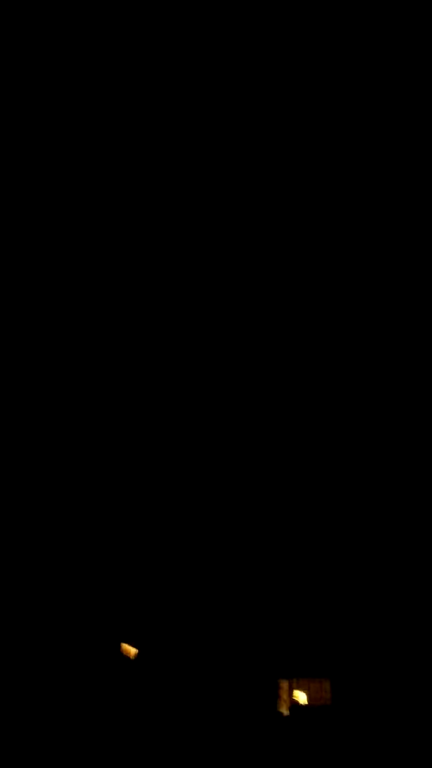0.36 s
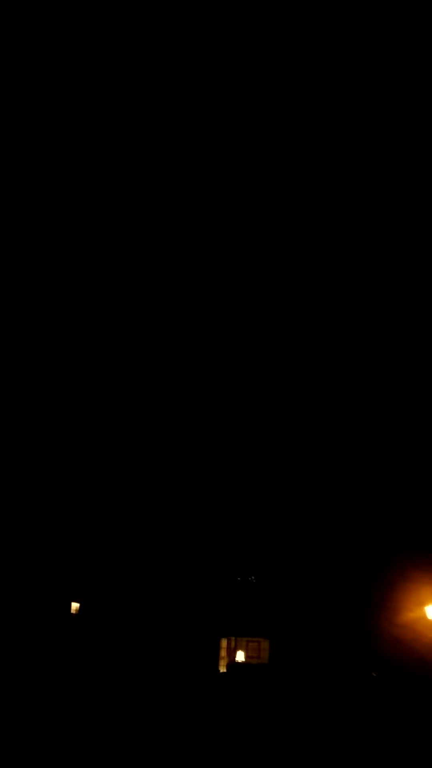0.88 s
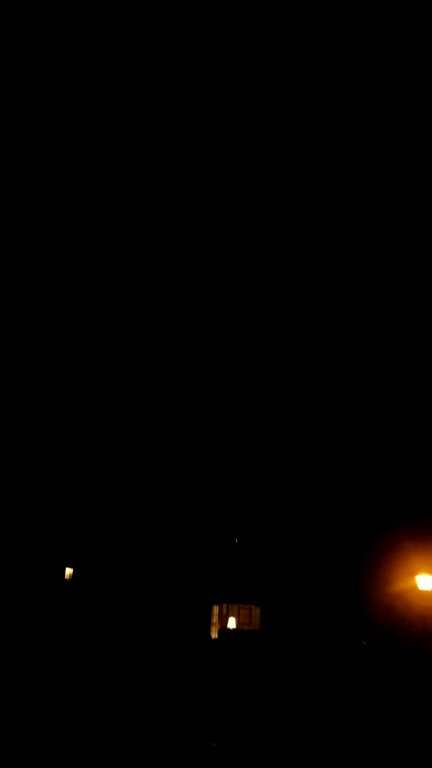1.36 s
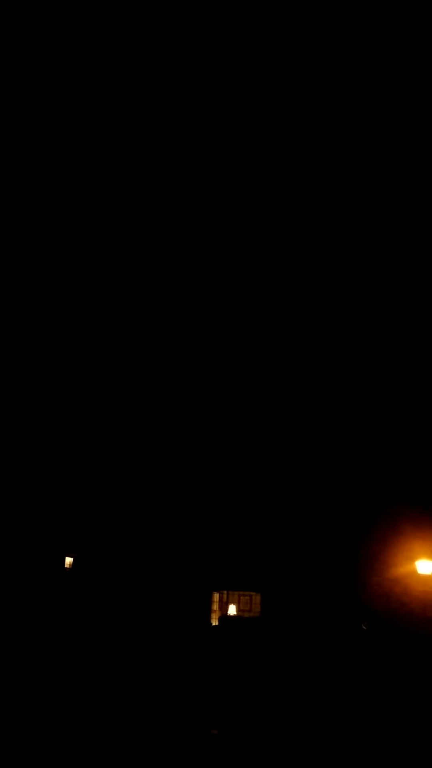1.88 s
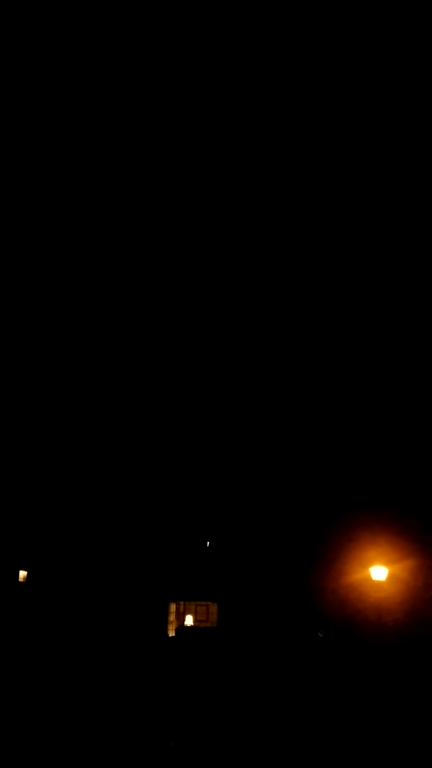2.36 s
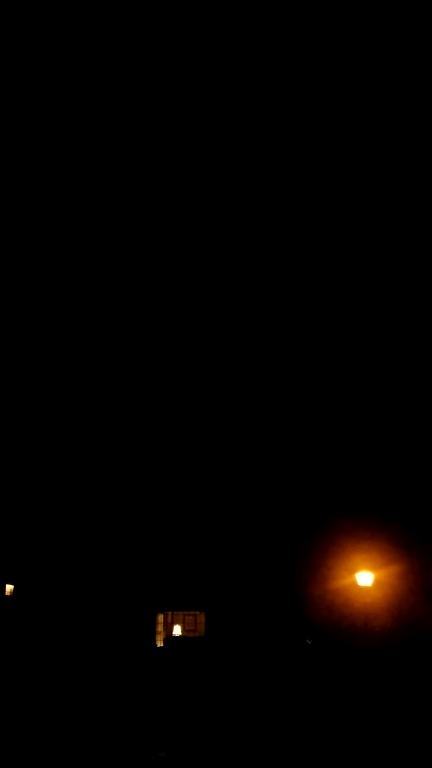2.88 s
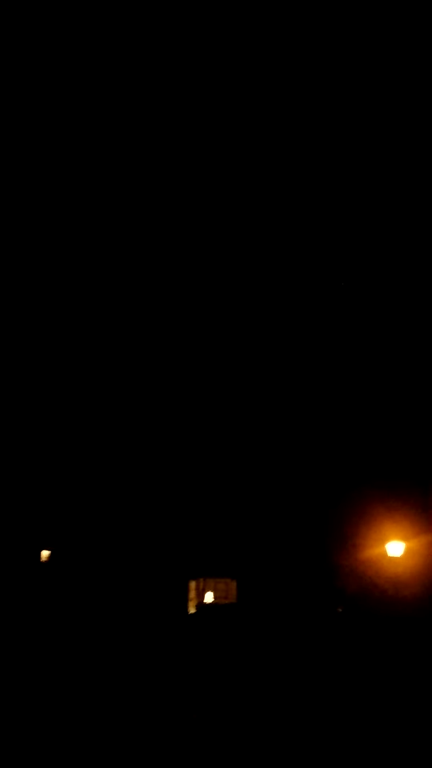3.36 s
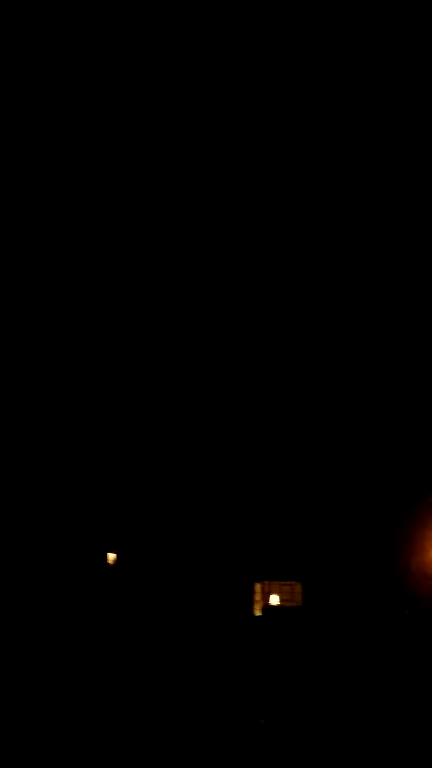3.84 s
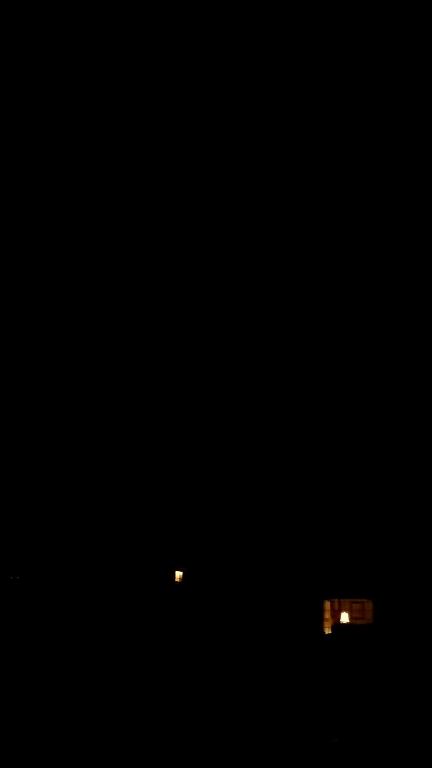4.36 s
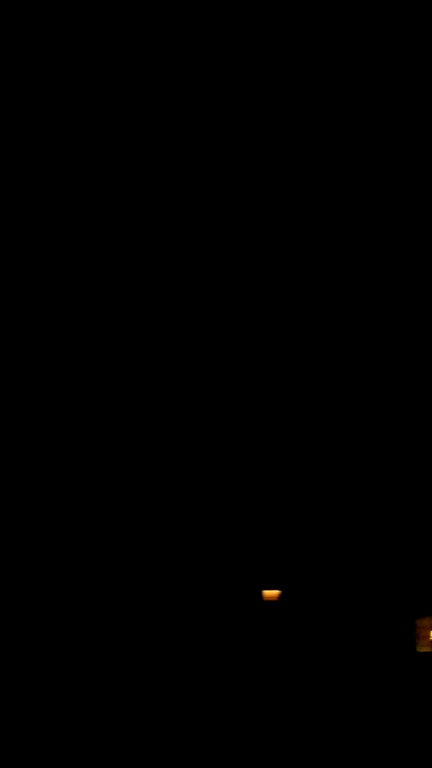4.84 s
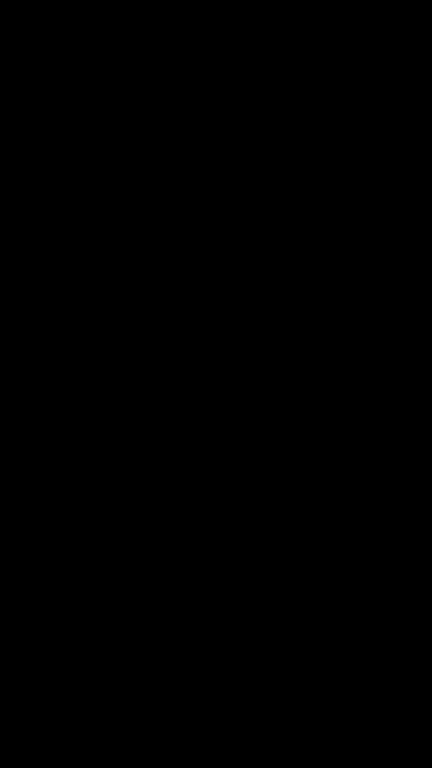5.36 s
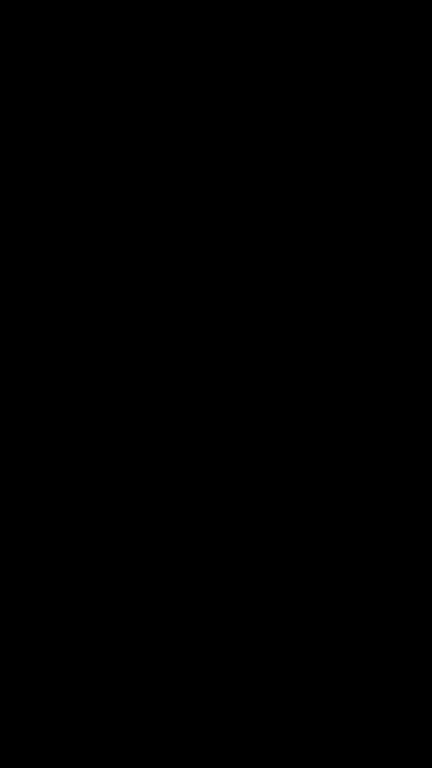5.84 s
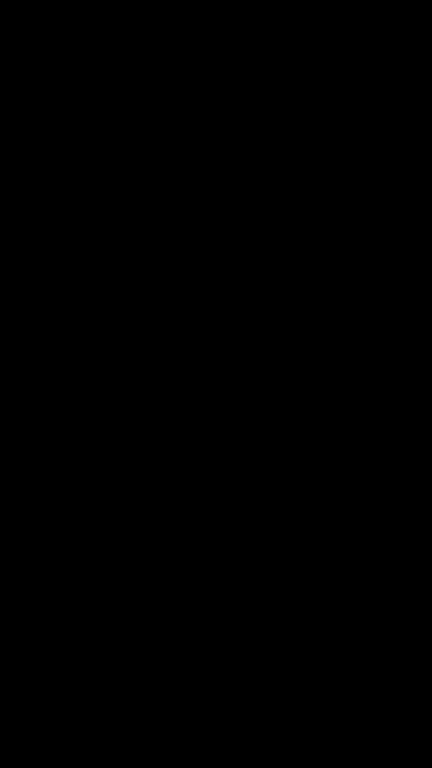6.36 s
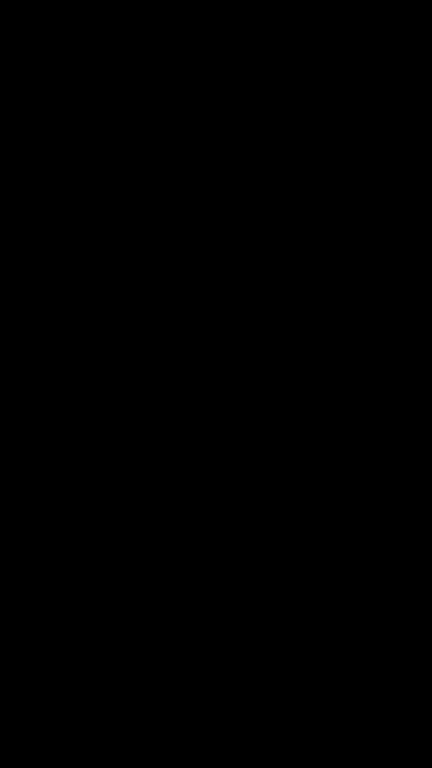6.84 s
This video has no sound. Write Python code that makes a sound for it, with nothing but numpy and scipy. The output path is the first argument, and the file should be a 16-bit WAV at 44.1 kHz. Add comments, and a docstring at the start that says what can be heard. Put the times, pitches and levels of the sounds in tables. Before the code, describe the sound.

A residential street at night, heard by a close-spaced stereo pair. Faint squeaks of a hinge, low then higher, sound from 0.05 to 0.4 s, with a soft thump at 0.25. A sharp bang at 0.37 opens a dense run of loud, short, slightly overloaded blasts until about 1.5 s, with slaps from house fronts and heavy rumble. More bangs come at 1.87 and 2.08, while crackling stars swell, with crisp separate pops thickest from 2.1 to 2.8, including a bang at 2.79. The crackle thins and dies by 3.3 s. In the lull are dull far thuds, then single strong booms at 3.86, 4.88 and a close double at 5.95, each with distant slaps and fading roll. A weaker boom falls at 5.5. Brief faint crackles appear near 4.4, 5.45 and 6.5-6.7; a very faint squeak comes at 6.7, then quiet air and hiss until 7 s.

```python
"""Fireworks over a night street

Each bang is an N-shaped pressure pulse, returned by ground and walls, then by a dying swarm of echoes.
Stars crackle as dense swarms of tiny pulses over a far rumble of wide ones; bright sparks sizzle.
Wavering sine partials make a hinge squeak faintly; shaped noise is the night air and hiss.
A pair of microphones hears it through a noise gate and a soft overload."""
import sys
import numpy as np
from scipy import signal
from scipy.fft import rfft, irfft
from scipy.io import wavfile
from scipy.ndimage import uniform_filter1d, minimum_filter1d

SR = 44100
rng = np.random.default_rng(int(sys.argv[2]) if len(sys.argv) > 2 else 0)


def store_pcm(level_fs):
    """Save levels as 16-bit WAV."""
    pcm = np.round(np.clip(level_fs, -1, 1) * 32767).astype(np.int16)
    wavfile.write(sys.argv[1], SR, np.atleast_2d(pcm).T)


def volts_from_db(level):
    """Convert decibel levels to linear amplitude ratios."""
    exponent = np.asarray(level, float) / 20
    return 10 ** exponent


N = 307377


def in_time(rows):
    """Columns interpolated over time; the first column is in seconds."""
    s, *columns = np.transpose(rows)
    return [np.interp(np.arange(N) / SR, s, c) for c in columns]


def rms_one(x):
    """Scale to unit rms."""
    return x / np.sqrt(np.mean(x ** 2) + 1e-20)


def cut(x, hz, kind, order=2):
    """Butterworth filter along time."""
    return signal.sosfilt(signal.butter(order, hz, kind, fs=SR, output="sos"), x + 1e-18)


def wander(below_hz):
    """Slow random curve, rms 1."""
    return rms_one(cut(rng.standard_normal(N), below_hz, "low"))


def coloured(x, points):
    """Shape by a spectrum, minimum phase so that nothing sounds early."""
    hz, db = np.transpose(points)
    grid_hz = np.maximum(np.arange(2049) * SR / 4096, 1)
    cepstrum = irfft(np.log(volts_from_db(np.interp(np.log(grid_hz), np.log(hz), db))))
    cepstrum[1:2048] *= 2
    cepstrum[2049:] = 0
    response = irfft(np.exp(rfft(cepstrum)))
    return signal.fftconvolve(x, response[None], axes=1)[:, :x.shape[1]]


def n_wave(width_ms, damping=.5, rounding=1.0):
    """A jump, a fall into suction and a small rebound, rounded by the air; height 1, and index of its top."""
    width_ms = max(width_ms, .08)
    t = np.arange(900) / SR * 1000 / width_ms   # in widths
    shape = np.cos(1.284 * t) * np.exp(-damping * t)
    pulse = cut(shape, min(1000 * rounding / width_ms, 9000), "low", order=3)
    return pulse / pulse.max(), int(np.argmax(pulse))


PORT_LAG_MS, PORT_SHADE_DB = .3, 0.2


def arrivals(size, per_s, spread_db, lean_ms=0.):
    """Random arrivals from all sides: each reaches one port a little earlier and louder; rms 1."""
    draw = rng.random((4, size))
    at = np.flatnonzero(draw[0] < per_s / SR)
    polarity = np.where(draw[2, at] < .5, 1, -1)
    height = volts_from_db(spread_db * np.minimum(-np.log(draw[1, at] + 1e-9), 4)) * polarity
    side = 2 * draw[3, at] - 1
    half_lag = np.round((side * PORT_LAG_MS + lean_ms) * SR / 2000).astype(int)
    out = np.zeros((2, size))
    for ch, sign in enumerate((1, -1)):
        port_at = np.clip(at + sign * half_lag, 0, size - 1)
        np.add.at(out[ch], port_at, height * volts_from_db(-sign * PORT_SHADE_DB * side))
    return rms_one(out)


# what the street gives back of an echo: freq_hz, gain_db
STREET_RESPONSE = [(40, -2), (90, -1), (170, 1.5), (300, 0), (560, 1), (760, -2), (1000, 2), (1220, -0.5),
                   (1400, -1), (2500, -1), (5000, -11)]


def street(x):
    """Echoes take the colour of the street's surfaces."""
    return coloured(x, STREET_RESPONSE)


SALVO_START_S, SALVO_END_S = .5, 1.3   # a quick run of shells close to the house fronts
FAR_AFTER_S = 1.6   # later shells burst farther off


def in_salvo(s):
    """True for shells of the quick run."""
    return SALVO_START_S < s < SALVO_END_S


LOUD_DB, BIG_MS = -6, .52   # only bangs both louder and wider get these returns
DELAY_SPREAD = .05   # fraction of delay


def returns(after_salvo, after_single, spread_db):
    """Rows (time_s, level_db, ..) thrown back after each loud big bang, with random delay and level."""
    rows = []
    for (s, db, width_ms, *_), chance in zip(BANGS, rng.normal(0, 1, (len(BANGS), 8, 2))):
        if db > LOUD_DB and width_ms > BIG_MS:
            surfaces = after_salvo if in_salvo(s) else after_single
            for (delay_s, rel_db, *rest), (late, loud) in zip(surfaces, chance):
                time_s = s + delay_s * (1 + DELAY_SPREAD * late)
                rows.append((time_s, db + rel_db + spread_db * loud, *rest))
    return rows


def after_bangs(levels_db, rise_s, t60_s):
    """Power that swells and dies after each row of BANGS, summed."""
    t = np.maximum(np.arange(0, N + 64, 64) / SR - np.array(BANGS)[:, :1], 0)
    swell = 1 - np.exp(-(t / rise_s) ** 2)
    power = volts_from_db(levels_db)[:, None] ** 2 * swell * volts_from_db(-60 * t / t60_s) ** 2
    return np.interp(np.arange(N) / 64, np.arange(t.shape[1]), power.sum(axis=0))


# crackling stars of single shells: full_strength_s, level_db, hold_s
SINGLE_STARS = [(3.474, -54.5, 0.019), (4.403, -36.5, 0.079), (5.429, -45, 0.048), (5.476, -44, 0.099),
                (6.489, -48, 0.12), (6.636, -56, 0.074)]
STAR_RISE_DB_PER_S, STAR_FALL_DB_PER_S = 326, 119


def stars_db():
    """Rise, hold and fall of the crackle for each single shell."""
    db, t = np.full(N, -120.), np.arange(N) / SR
    for s, level_db, hold_s in SINGLE_STARS:
        rise_db = STAR_RISE_DB_PER_S * (s - t).clip(0)
        fall_db = STAR_FALL_DB_PER_S * (t - s - hold_s).clip(0)
        db = np.maximum(db, level_db - rise_db - fall_db)
    return db


# night air and microphone hiss: freq_hz, relative_density_db
NIGHT_SPECTRUM = [(30, -7.5), (100, -0.5), (400, -3), (1000, -29), (1600, -18.5), (4000, -25.5),
                  (8000, -27), (12000, -28.5), (15500, -39.5)]
NIGHT_DB = -57
WHINE_HZ, WHINE_DB = 14760, -77.5


def night():
    """Steady night air and hiss, alike in both ports only in the bass, with a thin electronic whine."""
    mid, side = rng.standard_normal((2, N))
    side = cut(side, 340, "high", order=1) + .15 * side
    air = rms_one(coloured(np.array([mid + side, mid - side]), NIGHT_SPECTRUM))
    whine = rms_one(cut(rng.standard_normal((2, N)), [WHINE_HZ - 40, WHINE_HZ + 40], "band"))
    return volts_from_db(NIGHT_DB) * air + volts_from_db(WHINE_DB) * whine


RUMBLE_DB, RUMBLE_SALVO_DB = -27, -21.5   # relative to each row of BANGS
RUMBLE_RISE_S, RUMBLE_T60_S = 0.044, 0.64
RUMBLE_FLOOR_DB, FLOOR_WANDER_DB = -56, 2
RUMBLE_UNDER_CRACKLE_DB, RUMBLE_UNDER_STARS_DB = 1.5, -4
RUMBLE_BASS_DB = -8
RUMBLE_BRIGHT_DB, RUMBLE_BRIGHT_HZ = -10, (900, 1170)   # the street rings in a narrow upper band


def rumble():
    """Far echoes: a dense roll of wide, dull pulses; those of the bangs add a deep and a ringing band."""
    levels_db = np.array([db + (RUMBLE_SALVO_DB if in_salvo(s) else RUMBLE_DB) for s, db, *_ in BANGS])
    floor = volts_from_db(RUMBLE_FLOOR_DB + FLOOR_WANDER_DB * wander(16)) ** 2
    boom_power = after_bangs(levels_db, RUMBLE_RISE_S, RUMBLE_T60_S) + floor
    star_power = volts_from_db(in_time(CRACKLE_SWARM)[0] + RUMBLE_UNDER_CRACKLE_DB) ** 2
    star_power = star_power + volts_from_db(stars_db() + RUMBLE_UNDER_STARS_DB) ** 2

    pulse = n_wave(0.54, damping=0.44, rounding=0.55)[0]
    roll = signal.fftconvolve(arrivals(N, 700, 2.5), pulse[None], axes=1)[:, :N]
    deep = cut(arrivals(N, 270, 7.0), [55, 135], "band")
    bright = cut(arrivals(N, 610, 2.2), RUMBLE_BRIGHT_HZ, "band", order=3)
    lumps = volts_from_db(0.91 * wander(11.5))
    bright_lumps = volts_from_db(RUMBLE_BRIGHT_DB + 2.5 * wander(25))

    out = bright_lumps * np.sqrt(boom_power) * rms_one(bright)
    out = out + lumps * np.sqrt(boom_power + star_power) * rms_one(roll)
    return out + volts_from_db(RUMBLE_BASS_DB) * np.sqrt(boom_power) * lumps * rms_one(deep)


# bangs, near and far, and some of their strongest slap-back echoes:
# peak_s, level_db, pulse_width_ms, relative_swarm_db, relative_scatter_db
BANGS = [(0.024, -45, 0.45, 5.5, -26), (0.06, -42, 0.27, 6, -24.5), (0.2448, -20, 1.45, -6.5, -33),
         (0.3738, 0.5, 0.44, -5.5, -22.5), (0.457, -10.5, 0.78, -7, -22.5), (0.543, 4.5, 0.65, -4.5, -15),
         (0.6564, 0, 0.42, -8, -17.5), (0.6919, 2, 0.7, -2.5, -12), (0.8229, 2.5, 0.76, -4, -17),
         (0.9451, 2, 0.55, -4, -16), (1.0841, 3, 0.66, -3.5, -13.5), (1.199, -4.5, 0.4, -12.5, -30),
         (1.2229, -3.5, 0.35, -6.5, -26), (1.4215, -0.5, 0.71, -3.5, -13.5), (1.4917, -8, 0.36, -7.5, -32),
         (1.523, -9, 0.6, -1, -17), (1.8654, -4, 0.57, -7.5, -21), (2.076, -3.5, 0.38, -2, -17),
         (2.789, -8, 0.51, -4, -22), (2.8687, -15.5, 0.54, -15, -17), (3.372, -25.5, 0.58, -7, -42),
         (3.5206, -30, 0.51, 2.5, -38), (3.8572, -1.5, 0.522, -5, -21), (4.1993, -25.5, 1.35, -5.5, -60),
         (4.5506, -30.5, 0.3, 1.5, -9.5), (4.8828, -2, 0.58, -3.5, -21), (5.511, -20, 1.09, -1.5, -19),
         (5.8473, -39.5, 0.97, 2.5, -34.5), (5.945, -3, 0.72, -8, -18.5), (5.957, -5.5, 0.45, -6, -40),
         (6.348, -27.5, 0.84, -3.5, -53), (6.519, -34.5, 1.3, -10, -26.5)]
# distinct slaps off far houses after single shots: same columns
FAR_SLAPS = [(1.59, -21, 0.53, -8, -32), (3.047, -29, 0.68, 6, -40), (3.983, -19.5, 0.57, -2, -23),
             (4.052, -23.5, 0.7, -4.5, -22), (4.085, -21.5, 0.47, 0, -32), (4.219, -32, 0.84, 5.5, -52),
             (5.034, -14, 0.64, -3, -35), (5.111, -20.5, 0.62, -1.5, -33), (5.191, -27.5, 1, -2, -41),
             (6.07, -22, 0.46, 0, -31), (6.115, -25, 0.63, -12, -35), (6.165, -21.5, 0.45, -3.5, -31),
             (6.378, -34.5, 0.47, -3, -45)]
# house slaps after salvo shells: delay_s, relative_level_db, then the last three columns above
SALVO_SLAPS = [(.05, -14, 0.93, -3, -17)]
# returns from ground and near walls: delay_ms, relative_level_db, narrowing (fraction of pulse width)
NEAR_ECHOES = [(2.052, -2.5, 0.27), (4.95, -15, -.4), (12.75, -6.5, 0.01), (17.47, -10, 0.7),
               (21.8, -13, 0.5), (28, -17, .3)]
# loud bangs come from the launch side, faint ones from across the street: level_db, left_lag_ms
BEARING = [(-19.5, -0.22), (-16, -0.16), (-1, 0.12)]
CRACK_DB = -21
FAR_AIR_HZ = 4500   # the air dulls far blasts
LEAD = 20   # samples kept free ahead of the pulse


def bangs():
    """Direct pulse, near returns, a two-slope echo swarm and a treble scatter from leaves and edges."""
    size = SR // 2
    out, echoes = np.zeros((2, 2, N + 2 * size))
    t = np.arange(size) / SR
    swarm_shape = (1 - np.exp(-t / 0.003)) * (volts_from_db(-60 * t / 0.14) + volts_from_db(-13.5 - 60 * t / 1.42))
    scatter_shape = (1 - np.exp(-(t / 0.0078) ** 2)) * (volts_from_db(-60 * t / 0.14) + volts_from_db(-11.5 - 60 * t / 0.88))
    fade = np.clip((size - np.arange(size)) / 4000, 0, 1)
    for peak_s, db, width_ms, swarm_db, scatter_db in BANGS + FAR_SLAPS + returns(SALVO_SLAPS, [], 0.56):
        lag_ms = np.interp(db, *np.transpose(BEARING))
        pulse, top = n_wave(width_ms)
        swarm = volts_from_db(swarm_db - 20.0) * swarm_shape * arrivals(size, 500, 2.4, lean_ms=1.26 * lag_ms)

        paths = np.zeros((2, size))
        half_lag = round(lag_ms * SR / 2000)
        paths[0, LEAD + half_lag] = 1
        paths[1, LEAD - half_lag] = 1
        front, front_top = n_wave(width_ms / 3)
        crack = np.roll(front, top - front_top)   # the steep shock front
        sound = signal.fftconvolve(paths, (pulse + volts_from_db(CRACK_DB) * crack)[None], axes=1)[:, :size]

        chances = rng.normal(0, 1, (len(NEAR_ECHOES), 3))
        for (delay_ms, echo_db, narrowing), (late, loud, side) in zip(NEAR_ECHOES, chances):
            echo = n_wave(width_ms * (1 - narrowing))[0]
            echo = volts_from_db(0.72 * swarm_db - 1.0 + echo_db + 0.39 * loud) * echo
            for ch, sign in enumerate((1, -1)):
                port_ms = delay_ms * (1 + .03 * late) + sign * (lag_ms / 2 + .05 * side)
                i = LEAD + round(port_ms * SR / 1000)
                sound[ch, i:i + len(echo)] += echo
        if peak_s > FAR_AFTER_S:
            sound = cut(sound, FAR_AIR_HZ, "low", order=3)

        scatter = cut(cut(arrivals(size, 6000, 3.4), 1100, "high"), 2610, "low", order=4)
        sound += volts_from_db(scatter_db) * scatter_shape * rms_one(scatter)
        i = max(round(peak_s * SR) - top - LEAD, 0)
        out[:, i:i + size] += volts_from_db(db) * sound * fade
        swarm = signal.fftconvolve(swarm, pulse[None], axes=1)[:, :size]
        echoes[:, i:i + size] += volts_from_db(db) * swarm * fade
    return (out + street(echoes))[:, :N]


SIZZLE_DB, SIZZLE_PER_TREBLE_DB, FAR_SIZZLE_DB = -20.5, 1.29, -7
SIZZLE_RISE_S, SIZZLE_T60_S = 0.0054, 0.89


def sizzle():
    """Sparks of bright shells: very dense, tiny bright ticks, fainter for far shells."""
    peak_s, level_db, _, _, scatter_db = np.transpose(BANGS)
    levels_db = SIZZLE_DB + SIZZLE_PER_TREBLE_DB * (level_db + scatter_db)
    levels_db = levels_db + FAR_SIZZLE_DB * (peak_s > FAR_AFTER_S)
    power = after_bangs(levels_db, SIZZLE_RISE_S, SIZZLE_T60_S)
    ticks = cut(cut(arrivals(N, 8200, 2.4), [3500, 13500], "band"), 4400, "low", order=1)
    return np.sqrt(power) * rms_one(ticks)


def squeak(rows, partials):
    """Stick-slip tone: a few upper partials, wavering in strength, off to one side."""
    hz, db, tilt_db = in_time(rows)
    on = (np.arange(N) > rows[0][0] * SR) & (np.arange(N) < rows[-1][0] * SR)
    phase = 2 * np.pi * np.cumsum(hz * (1 + .004 * wander(60))) / SR
    tone = 0
    for k, partial_db in partials:
        waver_db = 4.0 * wander(25)
        tone = tone + volts_from_db(partial_db + tilt_db * (k - 4) + waver_db) * np.sin(k * phase)
    tone = volts_from_db(db) * on * tone
    return np.array([tone, volts_from_db(-2.0) * np.roll(tone, 6)])   # right: fainter, 6 samples later


# hinge squeaks: time_s, pitch_hz, level_db, tilt_db_per_partial
LOW_SQUEAK = [(.03, 462, -63, -12), (.07, 467, -54, -12), (.1, 468, -47, -6), (.13, 462, -52, 3),
              (.155, 462, -58, -2), (.19, 467, -60, -4), (.26, 466, -59, -8)]
HIGH_SQUEAK = [(.228, 612, -62, 0), (.25, 626, -55, 0), (.275, 648, -52, -1), (.295, 654, -53, -1),
               (.325, 659, -47, -3), (.36, 661, -48, -4), (.39, 661, -55, -2)]
LATE_SQUEAK = [(6.62, 513, -70, 0), (6.66, 513, -56, 0), (6.78, 514, -57, 0), (6.81, 512, -70, 0)]
# their partials: pitch_multiple, relative_level_db
LOW_PARTIALS = [(4, 0), (5.1, 0)]
HIGH_PARTIALS = [(3, -12), (4, 3), (5, 4), (7, -11), (9, -12)]
LATE_PARTIALS = [(5, 0), (6, 4)]


def hinge():
    """Three stick-slip squeaks, each with its own partials."""
    early = squeak(LOW_SQUEAK, LOW_PARTIALS) + squeak(HIGH_SQUEAK, HIGH_PARTIALS)
    return early + squeak(LATE_SQUEAK, LATE_PARTIALS)


# crackling stars of the salvo: time_s, relative_level_db, density_per_s (twice the rate of distinct pops)
CRACKLE_SWARM = [(.52, -97, 2200), (.6, -50.5, 2900), (.8, -32, 1350), (1.35, -39.5, 3600),
                 (1.65, -35.5, 2270), (2.0, -31, 2000), (2.5, -33.5, 1280), (2.7, -38, 500),
                 (2.9, -41, 520), (3.1, -52, 1740), (3.2, -48.5, 3700), (3.28, -59, 1700),
                 (3.65, -72, 3600)]
# lone pops of crackling stars: time_s, level_db, left_over_right_db
LONE_POPS = [(1.624, -8.5, -1), (1.931, -9, 2), (2.147, -9, -0.5), (2.163, -10, 0), (2.191, -19, 4),
             (2.206, -23, -3), (2.281, -18, -2), (2.302, -7, 0), (2.334, -22, -2), (2.347, -10, -2),
             (2.357, -16, 4), (2.366, -10, -3), (2.392, -11, 0), (2.41, -13, 0), (2.437, -19, 0),
             (2.445, -13, -2), (2.471, -15, 0), (2.494, -18, 0), (2.519, -6, 0.5), (2.522, -7.5, 0),
             (2.535, -12, 4), (2.565, -12, -2), (2.594, -20, 0), (2.614, -16, -7), (2.64, -33, -3),
             (2.687, -6.5, -3), (2.727, -9.5, -0.5), (2.734, -23, -2), (2.749, -6.5, -3), (2.764, -12, -4),
             (2.872, -25, -5), (2.886, -28, 0), (2.911, -22, 2), (2.935, -14, -3), (2.949, -17, 2),
             (2.972, -13.5, -3), (2.987, -28, 0), (3.054, -25, -5), (3.15, -14, -5), (3.068, -31, 4),
             (3.168, -26, 6), (3.215, -25, -3), (3.481, -26.5, -4), (5.264, -35, -6), (6.498, -41, 1),
             (6.623, -34, -5), (6.637, -22.5, -6), (6.664, -27, -4)]
POP_FRONT_S, POP_AIR_HZ = .001, 3700   # the air dulls pops
STAR_ABOVE_HZ, STAR_BODY_DB = 920, 4.5   # stars of single shells are thinner
THIN_POP_ABOVE_HZ, THIN_POP_DB = 1770, 5   # pops from the first single stars on
SPARKS_DB = -21.5   # fine hiss, relative to the salvo crackle


def crackle():
    """Stars pop as tiny blasts in a dense random swarm; lone pops echo briefly."""
    db, density_per_s = in_time(CRACKLE_SWARM)
    small = arrivals(N, density_per_s / 2, 1.96) * np.sqrt(2000 / density_per_s.clip(50))
    small += volts_from_db(-6.0) * arrivals(N, 8000, 2.3)   # blur of their echoes
    fizz = rms_one(cut(cut(small, [600, 3000], "band", order=1), 2780, "low", order=4))
    thin = cut(fizz, STAR_ABOVE_HZ, "high", order=3) + volts_from_db(STAR_BODY_DB) * fizz
    swarm = volts_from_db(db + 7.5) * fizz
    swarm = swarm + volts_from_db(stars_db() + 4.5 + 0.98 * wander(40)) * rms_one(thin)

    clicks = np.zeros((2, N))
    for s, level_db, pan_db in LONE_POPS:
        i = round((s + POP_FRONT_S) * SR)
        clicks[:, i + 4] = volts_from_db(level_db + pan_db / 2), 0   # left, 4 samples later
        clicks[:, i] = 0, volts_from_db(level_db - pan_db / 2)
    late = round(SINGLE_STARS[0][0] * SR) - SR // 20
    clicks[:, late:] = volts_from_db(THIN_POP_DB) * cut(clicks[:, late:], THIN_POP_ABOVE_HZ, "high", order=4)
    t = np.arange(SR // 10) / SR
    pop_echo = volts_from_db(-29 - 60 * t / 0.06) * arrivals(len(t), 2500, 3)
    pop_echo[:, 0] = 1
    pulse = n_wave(.155, damping=.33, rounding=.6)[0]
    lone = signal.fftconvolve(signal.fftconvolve(clicks, pop_echo, axes=1), pulse[None], axes=1)

    sparks = rms_one(cut(arrivals(N, 10000, 1.5), [3600, 6200], "band", order=4))
    return swarm + volts_from_db(db + SPARKS_DB) * sparks + cut(lone[:, :N], POP_AIR_HZ, "low", order=5)


# echo clusters off house fronts: delay_s, relative_level_db, centre_hz, length_ms
SALVO_ROLLS = [(.021, -6.5, 266, 30), (.045, -3, 240.4, 22), (.075, -12, 330, 40), (.105, -8.5, 320, 22)]
SINGLE_ROLLS = [(.06, -29.5, 620, 33), (0.109, -61, 89, 39), (.12, -33, 736, 29), (.19, -13, 617, 28),
                (.26, -26.5, 800, 25), (.33, -39.5, 597, 29.46)]
ROLL_SPREAD_DB = 4.5
# dull far thuds and knocks: start_s, relative_level_db, centre_hz, length_ms
THUDS = [(3.368, -17.5, 724, 9.5), (3.385, -26.5, 330, 29), (3.517, -19.5, 400, 13),
         (3.547, -32.5, 110, 40), (4.538, -21.5, 119, 55), (4.587, -27, 151, 42), (5.539, -23, 128, 47),
         (5.599, -25.5, 167, 40), (5.64, -29, 257, 36), (5.688, -34.5, 142, 44), (6.717, -38, 101.5, 40),
         (6.83, -52.5, 900, 40), (6.94, -43, 410, 35)]


def rolls():
    """Each cluster or thud is a brief swarm of returns, ringing broadly around its centre."""
    out, t_ms = np.zeros((2, N + 6000)), np.arange(6000) / SR * 1000
    for s, db, hz, length_ms in returns(SALVO_ROLLS, SINGLE_ROLLS, ROLL_SPREAD_DB) + THUDS:
        swell = t_ms / (0.44 * length_ms) * np.exp(1 - t_ms / (0.28 * length_ms))
        cluster = cut(arrivals(len(t_ms), 1500, 5.3), [hz / 1.74, hz * 1.23], "band")
        cluster = rms_one(cut(cluster, 1600, "low", order=4))
        i = round(s * SR)
        out[:, i:i + len(t_ms)] += volts_from_db(db - 13.5) * swell * cluster
    return out[:, :N]


def scene():
    """All sources but the night floor, at the microphone pair."""
    return bangs() + street(rolls() + rumble()) + crackle() + sizzle() + hinge()


# left port over right: freq_hz, gain_db
PORT_BALANCE = [(60, 1), (110, 0), (200, -0.5), (380, 1), (700, -3), (1290, 1.5), (2380, -1), (4400, 5),
                (8120, 1), (15000, -7)]
# microphone colour: freq_hz, gain_db
MIC_RESPONSE = [(20, -32.5), (36, -15.5), (58, 8.5), (90, 6), (135, 4.5), (190, 1.5), (300, 1.5),
                (420, -0.5), (600, 0), (850, 1.5), (1150, -2), (1330, -2.5), (2000, -4), (3100, -2),
                (4200, -1), (6500, -1), (11500, -6.5), (13500, -18), (16000, -20.5)]


def microphones(dry):
    """Colour of the pair; the ports differ in response by half the balance each way."""
    ports = []
    for ch, sign in enumerate((1, -1)):
        balance = [(hz, sign * db / 2) for hz, db in PORT_BALANCE]
        ports.append(coloured(dry[[ch]], balance)[0])
    return coloured(np.array(ports), MIC_RESPONSE)


GATE_BASS_SHARE = 0.68   # of the treble's cut in dB


def noise_gate(x, open_db=-43, depth_db=-8, hold_s=0.0165, above_hz=1250):
    """Quiet passages sink, treble the most: the gate opens on level, holds, then shuts."""
    power = uniform_filter1d(np.mean(x ** 2, axis=0), size=900)
    share = np.clip((10 * np.log10(power + 1e-12) - open_db) / 6, 0, 1)
    half_hold = int(hold_s * SR / 2)
    share = -minimum_filter1d(-share, size=2 * half_hold + 1, origin=half_hold)
    shut_db = depth_db * (1 - uniform_filter1d(share, size=600))
    low = signal.sosfiltfilt(signal.butter(4, above_hz, fs=SR, output="sos"), x)
    return low * volts_from_db(GATE_BASS_SHARE * shut_db) + (x - low) * volts_from_db(shut_db)


def overload(x):
    """Rounded saturation towards a ceiling of 0.82."""
    return x / (1 + np.abs(x / .82) ** 4) ** (1 / 4)


def roll_off(x):
    """The treble ends steeply here."""
    return signal.sosfilt(signal.butter(12, 15630, fs=SR, output="sos"), x)


def record(dry):
    """Microphone colour, night floor, gate and rounded overload."""
    gated = noise_gate(microphones(dry) + night())
    mix = overload(gated)
    return roll_off(mix)


dry = scene()
out = record(dry)
store_pcm(out)
```